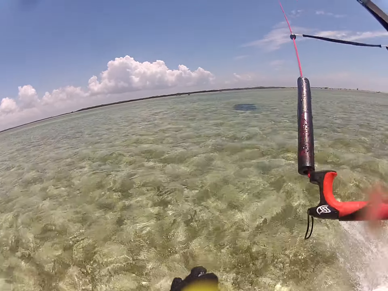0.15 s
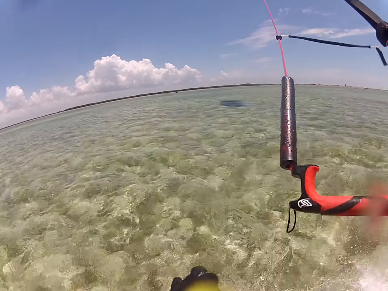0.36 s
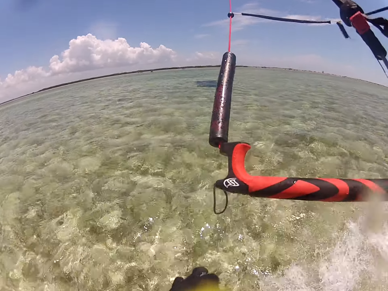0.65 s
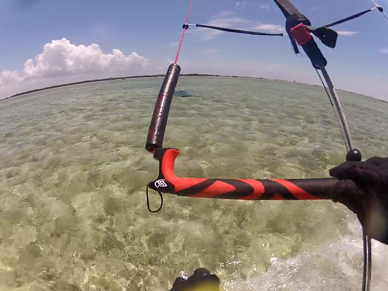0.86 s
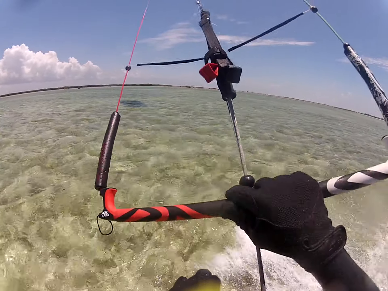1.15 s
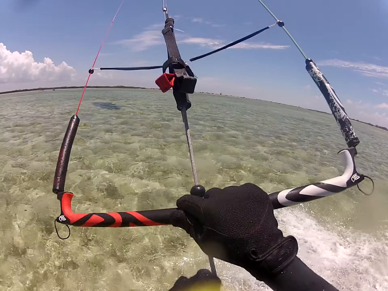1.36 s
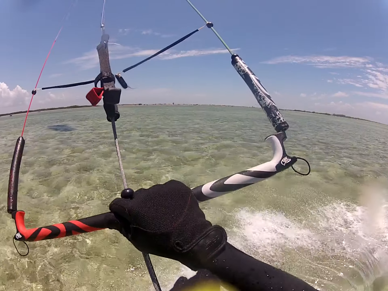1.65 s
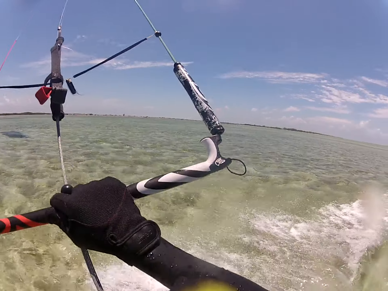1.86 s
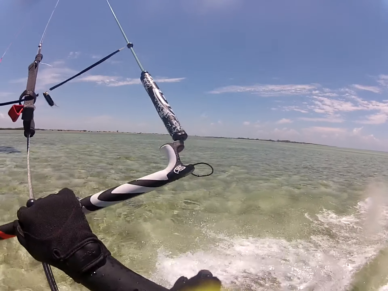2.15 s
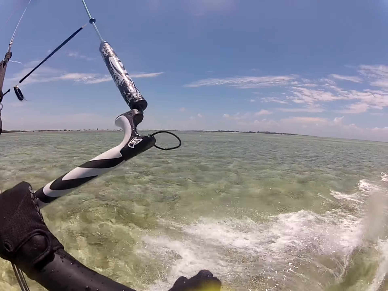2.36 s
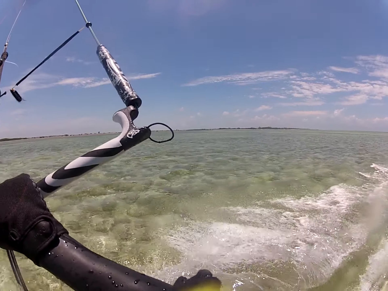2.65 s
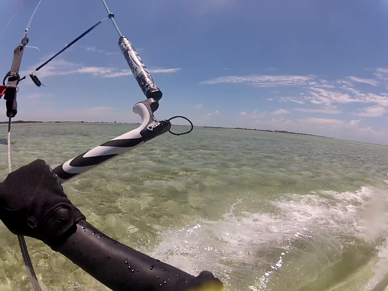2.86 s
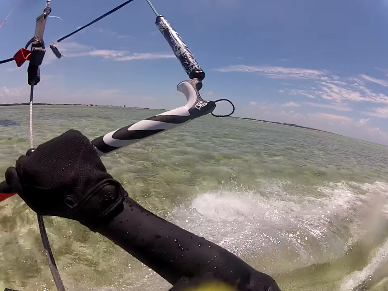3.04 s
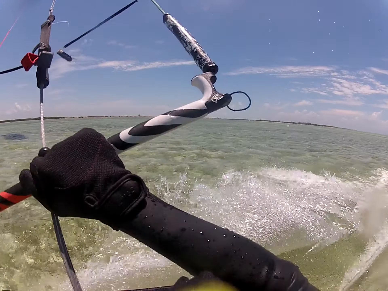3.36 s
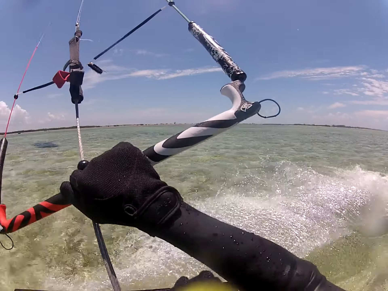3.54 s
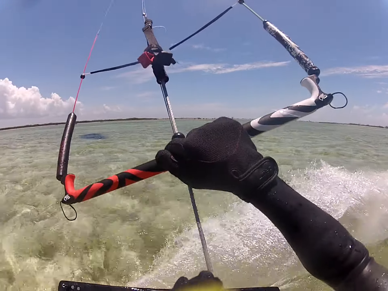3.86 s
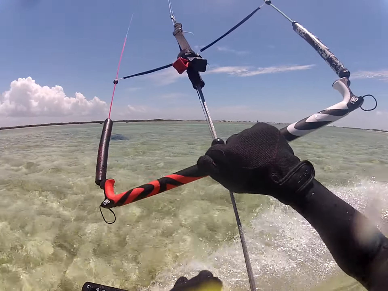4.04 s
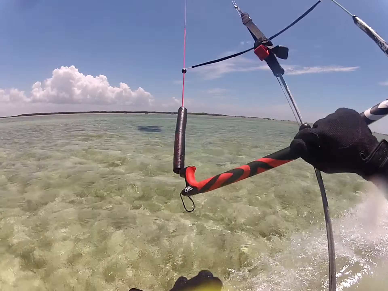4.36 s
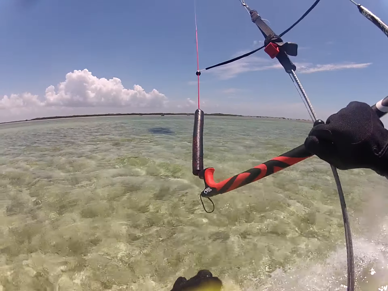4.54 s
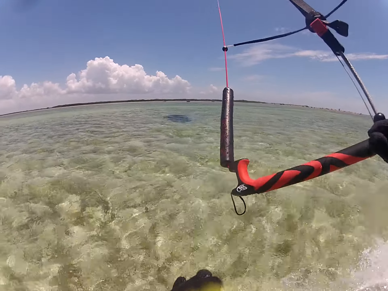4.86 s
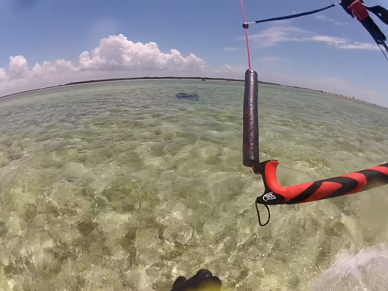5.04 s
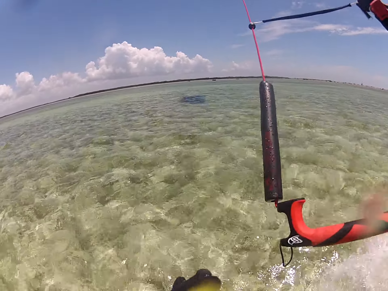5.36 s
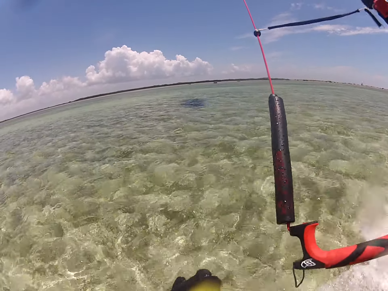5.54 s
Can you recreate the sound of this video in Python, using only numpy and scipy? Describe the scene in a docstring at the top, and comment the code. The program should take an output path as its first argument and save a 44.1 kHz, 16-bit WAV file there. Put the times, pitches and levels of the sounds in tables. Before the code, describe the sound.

Heard inside a plastic case, a board skims shallow chop: hissing spray, muffled wind buffeting, faint gurgles, ticking droplets and one short watery crackle.

```python
"""A kiteboard planes over shallow chop, heard from a camera in a waterproof case worn by the rider.
From the start spray rushes off the board through the resonances of the case and surges at wavelets,
wind buffets the case with a low rumble, and water gurgles under the board.
Soon flying drops ring the plastic and the gear gives the first of three dull knocks.
About halfway a sheet of water washes over the case: a brief crackle whose low body fades."""
import sys
import numpy as np
from scipy import signal
from scipy.fft import rfft, irfft
from scipy.io import wavfile
from scipy.ndimage import uniform_filter1d

SR = 44100
rng = np.random.default_rng(int(sys.argv[2]) if len(sys.argv) > 2 else 0)


def master(y):
    """Save y as 16-bit WAV."""
    cut = np.clip(np.atleast_2d(y).T, -1, 1)
    pcm = np.round(cut * 32767)  # scale
    wavfile.write(sys.argv[1], SR, pcm.astype(np.int16))


N = 251260

# resonances of the case: centre_hz, width_hz, struck_db (drop), outside_db (airborne), wet_db (wash)
CASE_MODES = [(340, 740, -33, -19.5, -12), (565, 110, -8.5, -23.5, 6), (802, 46, -0.5, -11.5, 4),
              (994, 339, 6.5, -14, -2), (1209, 173, -10, -11, -12), (1338, 92, -20, -17, -7.5),
              (1735, 164, -8, -11.5, 2.5), (1900, 317, -7.5, -7.5, -9), (2190, 470, -16, -8.5, -3),
              (2453, 250, -7, -10, -14), (2960, 720, -28, -16, -15), (3450, 406, -5, -13, -4),
              (3960, 340, -60, -22, -47), (4583, 620, -26, -19, -48.5), (5180, 760, -38, -26, -25),
              (6860, 1140, -47, -27.5, -25), (7455, 680, -37, -23.5, -44), (8565, 590, -13.5, -20.5, -13),
              (9550, 680, -22, -22, -15.5), (10050, 390, -17, -21.5, -17), (10980, 325, -8, -32.5, -16),
              (13050, 330, -9, -53, -16), (13830, 550, -29, -23, -40), (14700, 390, -25, -45, -41)]
# bands the case shuts out: centre_hz, width_hz, depth_db
SHUT_BANDS = [(6060, 400, 28), (11450, 460, 10)]
# spectrum of the wind: freq_hz, gain_db
WIND_COLOUR = [(12, -26), (24, -15), (40, 0), (66, -1.5), (85, -3.5), (108, -13.5), (150, -18),
               (230, -23.5), (400, -30), (800, -73)]
# spectrum of the churned water: freq_hz, gain_db
CHURN_COLOUR = [(80, -3), (170, -3.5), (290, -2), (400, -3), (580, -5), (900, -7.5), (1500, -10.5)]
# drops on the case: start_s, relative_level_db, extra_near_2khz_db, extra_treble_db
DROP_HITS = [(0.283, -28, 4, -5), (0.8507, -57, 16, 5), (0.887, -49.5, -5, -11), (1.7033, -51, -2, 2),
             (1.8062, -35.5, -9, -6), (2.0342, -32.5, -6, -7), (2.1834, -33.5, -10, -7),
             (2.29, -47, -2, -8), (2.412, -25, -6, -5.5), (2.428, -41.5, -1, -4), (2.5575, -53, 8, 11.5),
             (2.5592, -38.5, 13.5, -16), (2.7266, -41, -13, -10), (2.929, -40.5, 6.5, -4),
             (2.9416, -29.5, -5, -7), (3.0366, -55, 0, -10), (3.2307, -52, 12, 4),
             (3.2449, -27.5, -6.5, -9), (3.268, -39, -8, -8.5), (3.5382, -56.5, 24, 13.5),
             (4.1573, -37, -1, -6), (4.4205, -49.5, -8, -4), (4.6586, -56, 4, 4), (4.7373, -47.5, -10, -3),
             (4.9618, -49, 0, -12), (4.9701, -55.5, 17.5, 16.5)]
# dull knocks of the gear: start_s, level_db, pitch_hz, width_hz
GEAR_KNOCKS = [(0.5414, -43, 470, 520), (2.074, -48, 440, 140), (4.682, -45, 355, 168)]
# steady wake, thinning as the board runs smoothly: time_s, relative_spray_db
WAKE_LEVEL = [(0, -51), (.4, -55), (.95, -54), (1.35, -55), (1.95, -58), (2.4, -57), (3.0, -57),
              (3.3, -54.5), (3.95, -56), (4.45, -52.5), (4.85, -53.5), (5.7, -51.5)]
# fineness of the steady spray: time_s, mist_over_coarse_db
MIST_BALANCE = [(0, 0), (1.3, -1.5), (2.1, 2), (3.0, 1.5), (3.4, -2), (4.6, -3.5), (5.7, -1)]
# plumes thrown by wavelets: peak_s, relative_coarse_db, relative_mist_db, relative_churn_db, fall_s
WAVELET_PLUMES = [(0.0, -50.5, -51.5, -74, 0.029), (0.174, -49, -47.5, -51, .05),
                  (0.521, -53.5, -56, -53, 0.043), (0.7, -61, -53.5, -77, 0.07),
                  (0.85, -53, -51.5, -78, 0.014), (1.07, -53, -51.5, -53.5, 0.18),
                  (1.57, -51, -51.5, -67, 0.11), (1.76, -57.5, -56, -65, 0.11),
                  (2.6, -54.5, -57.5, -70, 0.072), (3.65, -62, -62, -55, 0.045),
                  (4.21, -50.5, -55.5, -64, 0.17), (4.34, -53, -63, -74, .07), (4.8, -70, -65, -60, 0.024),
                  (5.24, -54.5, -55, -63, 0.081), (5.6, -52, -52.5, -59.5, 0.1)]
# airstream over the case: time_s, relative_level_db
AIRSTREAM_LEVEL = [(0, -52.5), (1.0, -49.5), (2.3, -47.5), (4.0, -46.5), (4.4, -48), (5.7, -48.5)]
# single strong buffets of wind: peak_s, level_db
WIND_BUFFETS = [(1.73, -42), (2.56, -48), (2.785, -38), (3.06, -42)]

TOP_HZ = 15150
PLUME_RISE_S, RISE_SHARE = 0.025, 0.37  # rise = this time + share of the fall time
CHURN_DB, CHURN_FALL_SHARE = -61.5, 0.36  # steady gurgle; its surges settle sooner than the spray
EDDY_RATE_HZ, EDDY_SWING_DB = 9, 1.33
BUFFET_RISE_S, BUFFET_FALL_S = 0.022, 0.027
POCKET_HZ, POCKET_WIDTH_HZ, POCKET_DB = 383, 150, -3.5  # air folded under a wavelet
WASH_START_S, WASH_END_S, WASH_ATTACK_S, WASH_RELEASE_S = 2.775, 2.94, 0.036, 0.0074
WASH_FIZZ_DB, WASH_BODY_START_DB, WASH_THINNING_DB_PER_S = -45, -43, 57


def undb(db):
    """Decibels to gain."""
    return 10 ** (np.asarray(db) / 20)


def unit(x):
    """Scale to rms 1."""
    return x / np.sqrt(np.mean(x ** 2))


def curves(table):
    """Each column of a table, joined by straight lines in time."""
    s, *columns = np.transpose(table)
    return [np.interp(np.arange(N) / SR, s, column) for column in columns]


def walk(rate_hz):
    """Random levels held 1 / rate_hz s and smoothed twice; rms 1."""
    hold = max(int(SR / rate_hz), 2)  # samples
    held = rng.standard_normal(N)[np.arange(N) // hold]
    return unit(uniform_filter1d(uniform_filter1d(held, hold), hold))


def coloured(points):
    """Noise with a spectrum of (freq_hz, gain_db) points; rms 1."""
    hz, db = np.transpose(points)
    bin_hz = np.arange(N // 2 + 1) * SR / N
    gain = undb(np.interp(np.log(bin_hz + 1), np.log(hz), db, right=-120))
    return unit(irfft(rfft(rng.standard_normal(N)) * gain, N))


def patter(rate_hz, spread_db):
    """Tiny impacts at random moments, weak ones commonest when spread_db > 0; rms 1."""
    happens = rng.random(N) < rate_hz / SR
    size = undb(spread_db * np.minimum(rng.exponential(size=N), 4))
    return unit(happens * size * rng.choice([-1, 1], N))


def freqs(size=4096):
    """Frequencies (Hz) at which responses are drawn."""
    return np.arange(size // 2 + 1) * SR / size


def peak(hz, width_hz):
    """Gain of one steep-sided resonance."""
    return 1 / (1 + (2 * (freqs() - hz) / width_hz) ** 2)


def ring(gain):
    """Minimum-phase impulse response with this gain, by folding the cepstrum."""
    cepstrum = irfft(np.log(gain + 1e-7))
    half = len(cepstrum) // 2
    fold = np.concatenate([[1], np.full(half - 1, 2), [1], np.zeros(half - 1)])
    return irfft(np.exp(rfft(cepstrum * fold)))


def case(mode_db):
    """Impulse response of the case: mode powers add, shut bands are notched out."""
    power = sum((undb(db) * peak(row[0], row[1])) ** 2 for row, db in zip(CASE_MODES, mode_db))
    shut_db = sum(depth_db * np.exp(-(2 * (freqs() - hz) / width_hz) ** 2)
                  for hz, width_hz, depth_db in SHUT_BANDS)
    return ring(np.sqrt(power) * undb(-shut_db))


def through(x, response):
    """A sound passed through a response, at rms 1."""
    return unit(signal.fftconvolve(x, response)[:N])


def mode(hz, width_hz):
    """A resonance that swells for about 1 / (pi width_hz) s and dies away; gain near 1 at its centre."""
    t = np.arange(3072) / SR
    fade_per_s = np.pi * width_hz
    envelope = 2 * fade_per_s ** 2 / SR * t * np.exp(-fade_per_s * t)
    return envelope * np.sin(2 * np.pi * hz * t)


def swell(s, rise_s, fall_s):
    """An envelope that builds smoothly to 1 at time s and dies away exponentially."""
    t = np.arange(N) / SR - s
    return np.exp(np.where(t < 0, -(t / rise_s) ** 2, -t / fall_s))


def plumes(steady_db, peak_db, fall_share):
    """Strength of a steady flow with the surge of every wavelet added in power."""
    power = undb(steady_db) ** 2
    for (s, *_, fall_s), db in zip(WAVELET_PLUMES, peak_db):
        surge = undb(db) * swell(s, PLUME_RISE_S + RISE_SHARE * fall_s, fall_share * fall_s)
        power = power + surge ** 2
    return np.sqrt(power)


def add(out, s, sound):
    """Mix a sound in at time s."""
    start = int(s * SR)
    out[start:start + len(sound)] += sound[:N - start]


def strike_rms(response):
    """Rms level of a response, its energy spread over 7 ms."""
    return np.sqrt(np.sum(response ** 2) / (.007 * SR))


def spray(coarse_gain_db=1.7, mist_gain_db=0.0, flutter_db=0.38):
    """Countless droplets fall back on the sea: a coarse rush in the low modes, a fine mist in the high."""
    hz, _, _, outside_db, _ = np.transpose(CASE_MODES)
    _, coarse_db, fine_db, _, _ = np.transpose(WAVELET_PLUMES)
    wake_db, = curves(WAKE_LEVEL)
    fineness_db, = curves(MIST_BALANCE)
    fine = hz > 2700
    low_modes = case(np.where(fine, -np.inf, outside_db))
    high_modes = case(np.where(fine, outside_db, -np.inf))
    flutter = undb(flutter_db * walk(40))  # shared by both

    coarse = unit(rng.standard_normal(N) + 0.78 * patter(rate_hz=2500, spread_db=3))
    coarse = coarse * undb(1.07 * walk(70))
    coarse = through(coarse, low_modes) * plumes(wake_db, coarse_db, 1)

    mist = unit(rng.standard_normal(N) + 0.5 * patter(rate_hz=4400, spread_db=7.0))
    mist = mist * undb(0.5 * walk(55))
    mist = through(mist, high_modes) * plumes(wake_db + fineness_db, fine_db, 1)
    return (coarse * undb(coarse_gain_db) + mist * undb(mist_gain_db)) * flutter


def wind():
    """Low noise swung by random eddies; strong buffets add in power."""
    air_db, = curves(AIRSTREAM_LEVEL)
    eddies = undb(air_db + EDDY_SWING_DB * walk(EDDY_RATE_HZ))
    buffets = sum(undb(db) * swell(s, BUFFET_RISE_S, BUFFET_FALL_S) for s, db in WIND_BUFFETS)
    return coloured(WIND_COLOUR) * np.hypot(eddies, buffets)


def churned_water(swing_db=2.0):
    """Water gurgles under the board; air pockets, rung by tiny impacts, gulp at each wavelet."""
    _, _, _, water_db, _ = np.transpose(WAVELET_PLUMES)
    churn = coloured(CHURN_COLOUR) * plumes(CHURN_DB, water_db, CHURN_FALL_SHARE)
    gulps = through(patter(rate_hz=600, spread_db=4), mode(POCKET_HZ, POCKET_WIDTH_HZ))
    gulps = gulps * plumes(-np.inf, water_db + POCKET_DB, CHURN_FALL_SHARE)
    return (churn + gulps) * undb(swing_db * walk(35))


def stray_drops(level_db=-68):
    """Soft random drops ring the case with its upper modes weakened."""
    hz, _, struck_db, _, _ = np.transpose(CASE_MODES)
    soft = case(struck_db + np.interp(hz, [1500, 10000], [0, -12]))
    return undb(level_db) * through(patter(rate_hz=43, spread_db=2.5), soft)


def burst(fade_s, spatter_db):
    """The force of a drop: one blow, with fragments spattering down as fading noise."""
    t = np.arange(2048) / SR
    spatter = rng.standard_normal(len(t)) * np.exp(-t / fade_s)
    return (t == 0) + undb(spatter_db) * spatter / np.linalg.norm(spatter)


def struck(mode_db, detune):
    """The case rings after a blow; neighbouring modes move in opposite senses."""
    out = 0
    for k, (row, db, stretch) in enumerate(zip(CASE_MODES, mode_db, detune)):
        out = out + (-1) ** k * undb(db) * mode(row[0] * stretch, row[1])
    return out


def drops(gain_db=3.0, scatter_db=0.5):
    """Each drop bursts and rings the case, with its own tilt toward the middle and upper modes."""
    hz, _, struck_db, _, _ = np.transpose(CASE_MODES)
    spot = rng.standard_normal((len(DROP_HITS), 2, len(CASE_MODES)))
    out = np.zeros(N)
    for (s, db, middle_db, top_db), (share, load) in zip(DROP_HITS, spot):
        mode_db = struck_db + scatter_db * share  # where it lands decides which modes speak
        detune = 1 + .01 * load  # clinging water shifts the modes
        extra_db = np.interp(hz, [1450, 1720, 2160, 2950], [0, middle_db, middle_db, top_db])
        force = burst(fade_s=0.0063, spatter_db=-4.5)
        body = signal.fftconvolve(force, struck(mode_db, detune))
        tick = signal.fftconvolve(force, struck(mode_db + extra_db, detune))
        add(out, s, tick * undb(db + gain_db) / strike_rms(body))  # level set before the tilt
    return out


def knocks():
    """Soft blows of the gear, each one heavily damped resonance."""
    out = np.zeros(N)
    for s, db, hz, width_hz in GEAR_KNOCKS:
        thud = mode(hz, width_hz)
        add(out, s, thud * undb(db) / strike_rms(thud))
    return out


def wash():
    """A sheet of water breaks on the case as a dense crackle; its low body fades as the sheet thins."""
    hz, _, _, _, wet_db = np.transpose(CASE_MODES)
    low = hz < 900
    t = np.arange(N) / SR
    landing = np.clip((t - WASH_START_S) / WASH_ATTACK_S, 0, 1)
    leaving = np.exp(-np.maximum(t - WASH_END_S, 0) / WASH_RELEASE_S)
    body_db = WASH_BODY_START_DB - WASH_THINNING_DB_PER_S * np.maximum(t - WASH_START_S, 0)
    crackle = patter(rate_hz=4000, spread_db=0.0)
    body = through(crackle, case(np.where(low, wet_db, -np.inf))) * undb(body_db)
    fizz = through(crackle, case(np.where(low, -np.inf, wet_db))) * undb(WASH_FIZZ_DB)
    return (body + fizz) * landing * leaving


def scene():
    """All sources summed at one microphone."""
    water_and_wind = spray() + wind() + churned_water()
    on_the_case = stray_drops() + drops() + knocks() + wash()
    return (water_and_wind + on_the_case)[None]


def record(dry):
    """The camera cuts the top: a steep elliptic low-pass at TOP_HZ."""
    return signal.sosfilt(signal.ellip(10, .2, 70, TOP_HZ, fs=SR, output="sos"), dry)


dry = scene()
out = record(dry)
master(out)
```